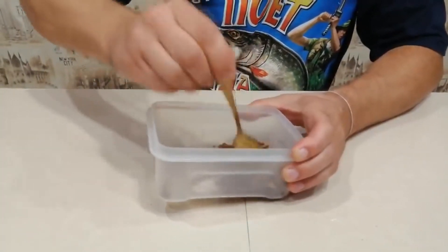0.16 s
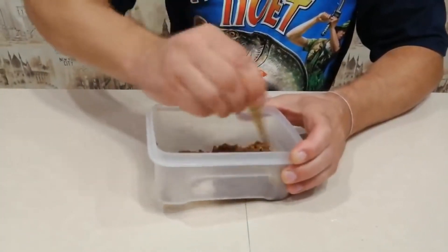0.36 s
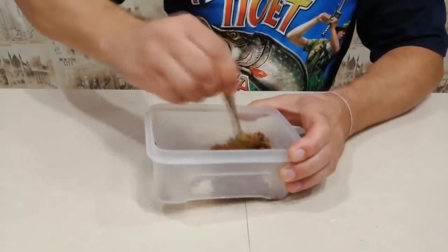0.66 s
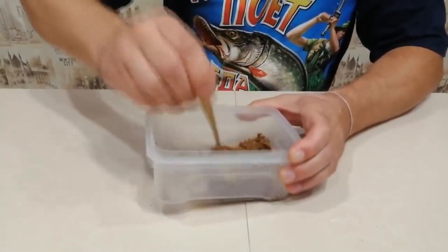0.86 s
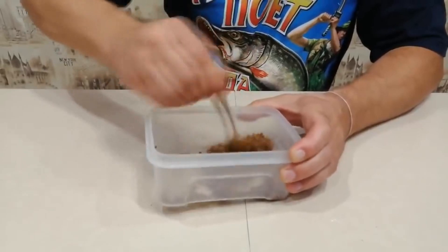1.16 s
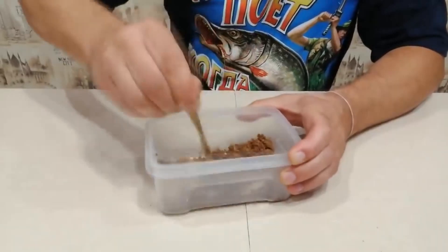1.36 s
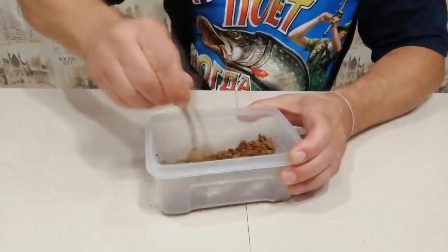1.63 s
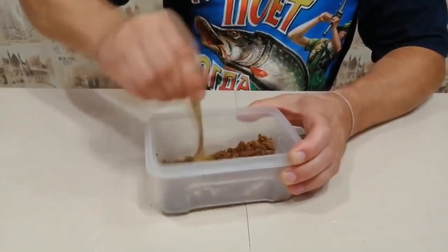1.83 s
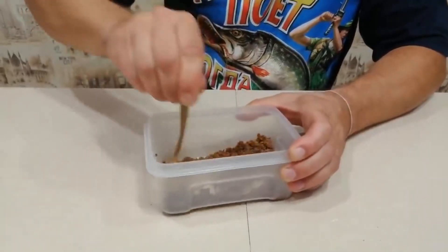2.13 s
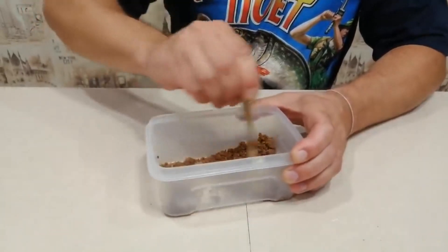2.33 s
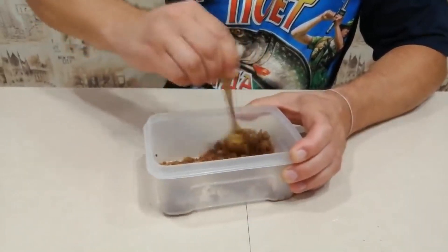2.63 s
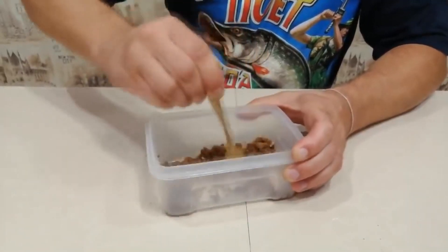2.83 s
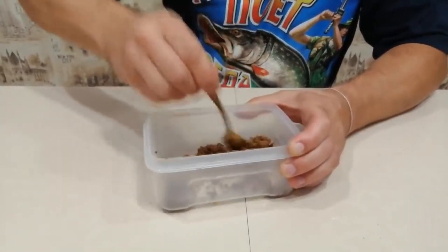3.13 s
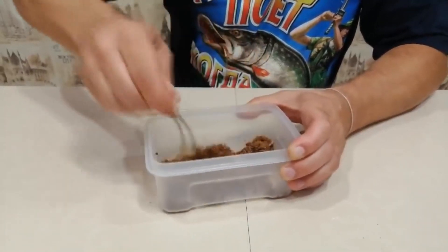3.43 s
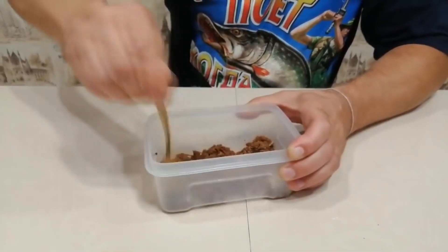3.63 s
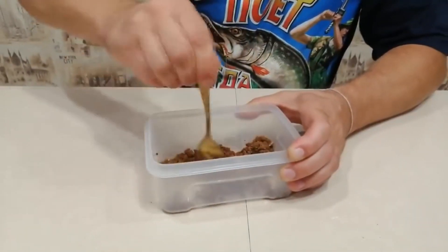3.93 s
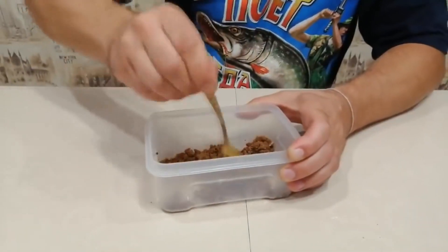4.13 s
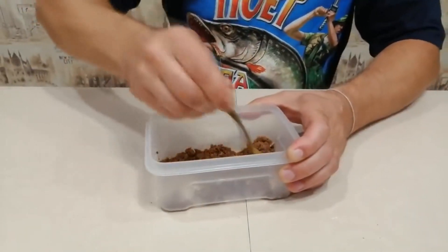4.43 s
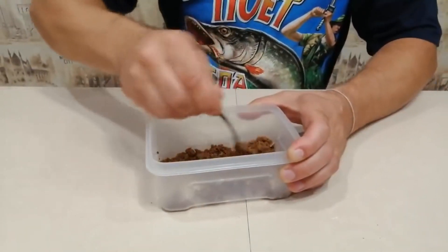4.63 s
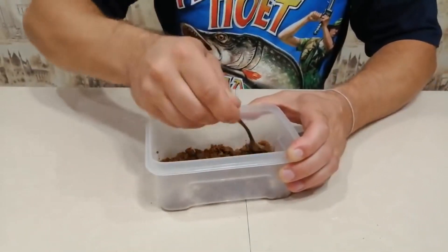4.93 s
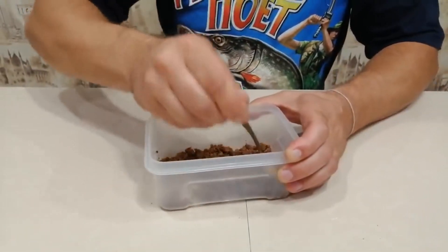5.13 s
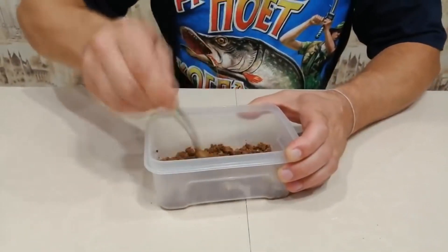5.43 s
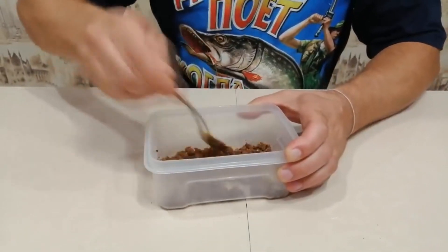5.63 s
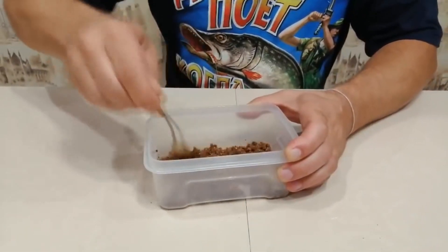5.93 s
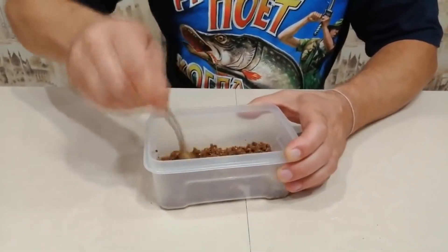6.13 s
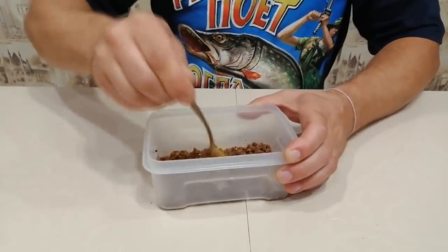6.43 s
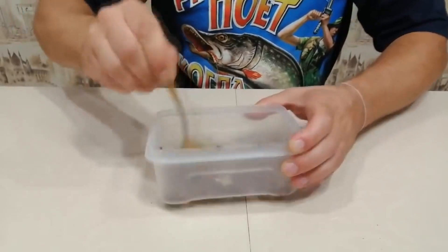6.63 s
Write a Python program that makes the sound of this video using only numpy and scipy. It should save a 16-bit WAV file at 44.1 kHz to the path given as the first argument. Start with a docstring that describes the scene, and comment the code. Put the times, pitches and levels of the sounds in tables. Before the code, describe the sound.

A metal spoon stirs damp crumbs in a plastic box on a table. It knocks unevenly against the floor and walls a few times a second, making short hollow clacks with a slight rattle and a soft thump from the table. Between knocks come faint rubbing on plastic and a gritty crunch and hiss. The stirring continues throughout, heard close up in stereo in a small, quiet room.

```python
"""A metal spoon stirs damp crumbs in a plastic box, on a table in a small room.
Each knock rings the box's floor, walls and corner, chatters on the rim and thumps the table top.
Between knocks the spoon rubs the plastic and crushes crumbs into a gritty crunch and hiss.
Heard close up on a stereo microphone whose two ports each colour the treble their own way;
behind it the room rings on for about a third of a second, over quiet room tone."""
import sys
import numpy as np
from scipy import signal
from scipy.fft import rfft, irfft, next_fast_len
from scipy.io import wavfile

SR = 44100
rng = np.random.default_rng(int(sys.argv[2]) if len(sys.argv) > 2 else 0)


def wav_out(sig):
    """Save sig, one row per channel (or a flat mono array), as 16-bit PCM at SR to the path in sys.argv[1]."""
    wavfile.write(sys.argv[1], SR, np.round(np.clip(np.atleast_2d(sig).T, -1, 1) * 32767).astype(np.int16))


N = 298557


def from_db(db):
    return 10 ** (np.asarray(db) / 20)


def unit_rms(x):
    return x / np.sqrt(np.mean(x ** 2) + 1e-20)


def lowpass(x, hz):
    return signal.sosfilt(signal.butter(2, hz, fs=SR, output="sos"), x)


def at_hz(curve, hz):
    """Read a curve of (Hz, value) rows along a log frequency axis."""
    points_hz, values = np.transpose(curve)
    return np.interp(np.log(np.maximum(hz, 1)), np.log(points_hz), values)


def in_time(rows):
    """Join rows of (seconds, values...) into one curve per column, sample by sample."""
    times, *columns = np.transpose(rows)
    return [np.interp(np.arange(N) / SR, times, column) for column in columns]


def coloured(x, spectrum):
    """Shape x by a dB spectrum and scale it to rms 1."""
    size = next_fast_len(N)
    gain = from_db(at_hz(spectrum, np.fft.rfftfreq(size, 1 / SR)))
    return unit_rms(irfft(rfft(x, size) * gain, size)[..., :N])


def ring(clicks, hz, t60):
    """One mode: each click starts a sine that dies by 60 dB in t60 seconds."""
    decay, step = from_db(-60 / (t60 * SR)), 2 * np.pi * hz / SR
    return signal.lfilter([0, np.sin(step)], [1, -2 * decay * np.cos(step), decay ** 2], clicks + 1e-18)


def strike(modes, levels_db, touches, shares=1, scatter_db=2.5):
    """Touches ring a part's modes, neighbours in opposite directions, in a new mix at every knock."""
    sound = 0
    scatter = scatter_db * rng.standard_normal((len(touches), len(modes)))
    for k, (hz, mode_db, t60) in enumerate(modes):
        clicks = np.zeros((len(levels_db), N))
        for channel, knock_db in zip(clicks, levels_db):
            strength = from_db(knock_db + mode_db + scatter[:, k])
            np.add.at(channel, touches, shares * strength[:, None])
        sound = sound - (-1) ** k * ring(clicks, hz, t60)
    return sound


# The room's diffuse sound at the two ports. Each row: frequency in Hz, left-right likeness from 0 to 1.
PORT_LIKENESS = [(60, 0.69), (180, 1), (550, 0.18), (1650, 0.074), (5000, 0.013)]

def stereo_noise(size, hz):
    """Two white noises, as alike as the ports are at this frequency."""
    mid, side = rng.standard_normal((2, size))
    alike = at_hz(PORT_LIKENESS, hz)
    return np.sqrt((1 + alike) / 2) * mid + np.sqrt((1 - alike) / 2) * side * [[1], [-1]]


# The still room at the microphone. Each row: frequency in Hz, relative spectral level in dB.
ROOM_TONE_SPECTRUM = [(12, -23), (20, -3), (74, -6.5), (130, -5), (337, -3.5), (459, -5.5), (873, -17),
                      (3740, -23.5), (6180, -16), (8650, -25.5), (10800, -29), (14700, -26), (16000, -40)]

def room_tone(level_db=-58):
    """Quiet room tone and microphone hiss, narrower in the bass and wide in the treble."""
    narrow, wide = stereo_noise(N, 100), stereo_noise(N, 5000)
    return from_db(level_db) * coloured(lowpass(narrow - wide, 600) + wide, ROOM_TONE_SPECTRUM)


# How long the small room rings. Each row: frequency in Hz, t60 in seconds.
TAIL_T60 = [(60, 0.27), (200, 0.44), (420, 0.34), (1100, 0.42), (2900, 0.26), (7700, 0.26), (15000, .25)]
# How strongly its tail reaches the microphone. Each row: frequency in Hz, gain in dB.
TAIL_GAIN = [(60, -20), (200, -1.5), (420, 1), (1100, -6.5), (2900, 0), (7700, -4), (15000, -0.5)]
# Standing waves between the walls. Each row: frequency in Hz, gain in dB, t60 in seconds.
STANDING_WAVES = [(205.5, -51, 0.4), (228.1, -50, 0.29), (318.7, -50, 0.18), (421.2, -51.5, 0.25),
                  (541.2, -43.5, 0.13), (614.4, -46.5, 0.18), (670.6, -51, 0.2), (842, -52, 0.16),
                  (999, -50, 0.13), (1072, -63.5, 0.42), (1116, -55, 0.38)]

def room_echoes(source, first_echo_s=0.004):
    """The walls answer with half-octave bands of dying noise and a few standing waves."""
    t = np.arange(SR) / SR
    response = np.zeros((2, SR))
    edges_hz = 45 * 2 ** np.arange(0, 8.6, .5)
    for low, high in zip(edges_hz, edges_hz[1:]):
        hz = np.sqrt(low * high)
        t60 = at_hz(TAIL_T60, hz)
        unit_energy = np.sqrt(6 * np.log(10) / (t60 * SR))
        tail = stereo_noise(SR, hz) * from_db(-60 * t / t60) * unit_energy
        band = signal.butter(2, [low, high], "band", fs=SR, output="sos")
        response += from_db(at_hz(TAIL_GAIN, hz)) * signal.sosfilt(band, tail * (t > first_echo_s))
    build_up = 1 - np.exp(-t / first_echo_s)
    for hz, gain_db, t60 in STANDING_WAVES:
        response += from_db(gain_db - 60 * t / t60) * np.sin(2 * np.pi * hz * t) * build_up
    return signal.fftconvolve(source[None], response, axes=1)[:, :N]


# The table top under the box. Each row: frequency in Hz, relative level in dB, t60 in seconds.
TABLE_MODES = [(78.07, 0, 0.43), (127, -3.5, 0.13)]

def table_rumble():
    """The dragging spoon keeps the table's lowest mode shaking."""
    hz, _, t60 = TABLE_MODES[0]
    return unit_rms(ring(rng.standard_normal(N), hz, t60))


def table_thumps(levels_db, touches):
    """Knocks push on the table; the heavy top takes no sharp edge."""
    return lowpass(strike(TABLE_MODES, [levels_db], touches)[0], 300)


# Short swells of gritty crunch and hiss, many just before a knock.
# Each row: centre in seconds, length in ms, relative crunch and hiss in dB.
GRIT_SWELLS = [(0.03, 28, -63, -49.5), (0.088, 26, -51, -53), (0.606, 15, -45, -48),
               (0.722, 20.0, -63, -50), (0.975, 18, -66, -60.0), (1.24, 12.0, -56, -51),
               (1.31, 22, -53, -46), (1.457, 14.0, -47, -56), (1.672, 16.0, -50, -56),
               (2.15, 34, -63.5, -66.0), (2.466, 17, -58, -47), (2.874, 7.7, -38.0, -50),
               (3.305, 18, -42, -45), (3.333, 18, -41.5, -53), (3.445, 16.0, -38, -55),
               (3.745, 11, -58, -66), (4.658, 11, -39, -43), (4.938, 15, -61.0, -59.0),
               (5.385, 30.0, -55.0, -51), (5.525, 16, -56, -73), (5.765, 14.0, -59, -51),
               (5.83, 23, -57.0, -50), (5.861, 16, -57, -50), (6.025, 22, -53, -50),
               (6.144, 14.0, -61, -62.0), (6.331, 14.0, -54, -57), (6.758, 15, -51, -56)]

def grit_swells():
    """Crunch and hiss gains that briefly swell and fade in a bell curve."""
    t, gains = np.arange(N) / SR, np.zeros((2, N))
    for centre_s, length_ms, *levels_db in GRIT_SWELLS:
        sigma_s = length_ms / 1000 / 4
        bell = np.exp(-.5 * ((t - centre_s) / sigma_s) ** 2)
        gains += from_db(levels_db)[:, None] * bell
    return gains


# The spoon's drag round the box. Each row: time in seconds, then relative levels in dB of
# table rumble, box rub, crumb crunch and crumb hiss.
DRAG_LEVELS = [(0.0, -56, -36, -60, -52), (0.05, -59, -44.5, -50, -44.5), (0.19, -77, -51, -56.5, -55),
               (0.4, -66, -73, -73, -89), (0.45, -65, -46, -51, -49), (0.54, -56, -41, -71, -49),
               (0.6, -47, -59, -46, -48), (0.66, -62, -47, -56.5, -63), (0.79, -65, -51.5, -58, -49),
               (0.92, -71, -57.5, -62, -63), (1.07, -58, -44, -57, -50.5), (1.21, -66, -46, -62, -64),
               (1.32, -70, -41.5, -42, -48), (1.39, -60, -68, -69, -74), (1.53, -68, -39, -44, -49),
               (1.64, -54, -61, -69, -77), (1.77, -60, -56, -47, -40.5), (1.85, -53, -65, -69, -98),
               (1.92, -55, -51, -36, -63), (1.98, -73, -51, -75, -95), (2.2, -55, -57, -69, -62),
               (2.34, -64, -56, -53, -48.5), (2.43, -39, -67, -56, -49), (2.51, -63, -46.5, -60, -52.5),
               (2.68, -51, -62, -55.5, -50), (2.85, -55, -67, -64, -72), (2.92, -49, -41, -43, -68),
               (2.98, -54, -38.5, -50.5, -48), (3.05, -74, -48, -74, -81), (3.11, -53, -76, -67, -79),
               (3.22, -61, -30, -62, -35), (3.26, -64, -33.5, -59, -64), (3.34, -37, -42, -45, -51),
               (3.37, -61, -52.5, -68, -65), (3.41, -66, -67, -68, -63), (3.51, -60, -25, -53, -37.5),
               (3.56, -47, -70, -45.5, -46), (3.67, -46, -55, -87, -95), (3.75, -57, -54, -51, -52),
               (3.86, -51.5, -46.5, -62, -45), (3.92, -65, -95, -83, -77), (4.15, -57, -46, -56, -86),
               (4.2, -44, -47.5, -75, -78), (4.28, -43, -42.5, -69, -75), (4.32, -58, -43, -67, -69),
               (4.41, -45, -56, -62, -85), (4.54, -45, -54.5, -64, -57), (4.64, -46, -55.5, -48, -66),
               (4.73, -52, -49.5, -36.5, -63), (4.81, -62, -71.5, -63, -92), (5.0, -46, -46.5, -61, -48),
               (5.05, -51, -52.5, -51, -48.5), (5.13, -39, -49, -57, -58), (5.19, -53, -28, -55, -50),
               (5.24, -52, -63.5, -93, -83), (5.33, -45, -66, -54, -67), (5.41, -62, -57.5, -73, -60),
               (5.6, -42, -66.5, -67, -112), (5.84, -60, -43.5, -62.5, -42), (5.94, -42, -66, -63, -78),
               (6.0, -34, -40, -53, -49), (6.09, -53, -54, -76, -83), (6.19, -53, -62.5, -60, -63),
               (6.35, -34, -62.5, -84, -69), (6.47, -38, -41.5, -56, -63), (6.62, -70, -57.5, -62.5, -59),
               (6.77, -44, -64.5, -65, -69)]
# Rubbed plastic, crunching and hissing crumbs. Each row: frequency in Hz, relative spectral level in dB.
RUB_SPECTRUM = [(88, -19.5), (150, -4.5), (334, -3), (668, -14), (892, 0.5), (1160, -13.5), (1500, -7),
                (1950, -38.5), (3300, -120)]
CRUNCH_SPECTRUM = [(820, -44.5), (1400, -18), (1590, -3.5), (1970, -2), (2270, 1.5), (3800, -7.5),
                   (4940, -47.5), (8360, -120)]
HISS_SPECTRUM = [(2120, -32), (3600, -14.5), (5430, -1), (5930, 2.5), (6510, 2), (7470, -0.5), (8570, -2),
                 (11100, -13.5), (13000, -13.5), (13900, -25), (14800, -9), (15400, -14.5), (16000, -23.5)]

def spoon_drag(grains_per_s=2500, spread_db=2, gain_db=-5.5):
    """Crumbs crush under the spoon as dense, uneven grains. Returns table rumble and scraping."""
    rumble_gain, rub_gain, crunch_gain, hiss_gain = map(from_db, in_time(DRAG_LEVELS))
    crunch_swell, hiss_swell = from_db(8) * grit_swells()
    sizes = from_db(spread_db * np.minimum(rng.exponential(1, N), 5)) * rng.standard_normal(N)
    grains = sizes * (rng.random(N) < grains_per_s / SR)
    rumble = rumble_gain * table_rumble()
    rub = rub_gain * coloured(grains, RUB_SPECTRUM)
    crunch = (crunch_gain + crunch_swell) * coloured(grains, CRUNCH_SPECTRUM)
    hiss = (hiss_gain + hiss_swell) * coloured(grains, HISS_SPECTRUM)
    return from_db(gain_db) * rumble, from_db(gain_db) * (rub + crunch + hiss)


def chatter(start_s, contact_ms, count=6, fade_db=-2):
    """The spoon bounces in uneven, fading touches. Returns their sample positions and strengths."""
    jitter, sizes = np.transpose(rng.random((len(start_s), count, 2)), (2, 0, 1))
    jitter[:, 0], sizes[:, 0] = 0, 1   # the first touch is on time and the strongest
    delay_s = (np.arange(count) + jitter) / count * contact_ms[:, None] / 1000
    touches = np.minimum(np.round((start_s[:, None] + delay_s) * SR).astype(int), N - 1)
    sizes = sizes * from_db(fade_db * np.arange(count))
    return touches, sizes / np.linalg.norm(sizes, axis=1, keepdims=True)


# Modes of the plastic box and the metal spoon.
# Each row: frequency in Hz, relative level in dB, t60 in seconds.
FLOOR_MODES = [(232.7, -11.5, 0.044), (339, -7.5, 0.079), (416, -6.5, 0.061), (555, -2, 0.021)]
WALL_MODES = [(714, -5, 0.024), (900, -3, 0.024), (1070, -4, 0.021), (1282, -6.5, 0.014)]
CORNER_MODES = [(1570, 1.5, 0.019), (1724, 5, 0.0082)]
RIM_MODES = [(2394, 3, 0.0095), (2670, -4.5, 0.014), (3040, 0, 0.0033)]
SPOON_MODES = [(4080, 2.5, 0.0026), (5270, 1.5, 0.0065), (6560, 8, 0.0026), (8840, -1.5, .003),
               (9930, -8.5, 0.004), (15100, -22.5, .0025)]
# Knocks close to the microphone. Each row: start in seconds, relative levels in dB of table, floor,
# wall, corner, rim and spoon, left over right in dB, contact time in ms.
SPOON_KNOCKS = [(0.0784, -93.0, -63, -42, -36, -50, -46, -4, 2.5),
                (0.0966, -56, -53, -32.5, -41, -44, -37.0, 8, 2.44),
                (0.1108, -66, -59, -33, -26, -58.0, -46, -3, 2.5),
                (0.272, -74, -77, -61.0, -58, -64.0, -51, -1, 3),
                (0.3187, -62, -64, -50.0, -46, -58.0, -56, 1.0, 2.4),
                (0.3685, -69, -59, -30.5, -47, -50.0, -55, 2, 3.3),
                (0.3826, -60, -51, -23, -18.5, -30.0, -25, -3.5, 0.95),
                (0.4338, -56, -28, -22.5, -33, -26, -31.5, -4, 3),
                (0.4858, -36, -20, -16, -24, -25.5, -27, -1, 2.9),
                (0.5995, -60, -45, -32, -46, -37, -32, 1, 4.7),
                (0.696, -47.5, -41, -53, -52.0, -49, -46, 3, 3.1),
                (0.727, -34.5, -33, -54, -61.0, -53, -42, 7, 6.3),
                (0.8074, -52, -49, -38.0, -32, -27, -33.5, 0, 4.7),
                (0.8648, -79, -70, -39, -36, -50, -43.0, -2, 0.94),
                (0.919, -69, -80.0, -57.0, -57.0, -71.0, -51.0, 0.0, 2.2),
                (0.983, -57.0, -42, -37, -41, -62, -46, -1, 3),
                (1.015, -34.5, -27.5, -24.5, -39, -41, -38.5, 4, 2.26),
                (1.062, -65.0, -58.0, -59.0, -61.0, -73.0, -58, 2, 2.0),
                (1.1331, -65, -45, -24.5, -35, -58.0, -49, -4, 2.4),
                (1.2493, -30.5, -22, -54, -28.0, -22, -19, 3, 1.52),
                (1.4673, -51, -22.5, -17, -13, -19, -27.5, 0.5, 1.34),
                (1.6838, -30.5, -22, -20.0, -20, -27.5, -27, -4, 1.58),
                (1.866, -58.0, -37, -27, -38.0, -46.0, -44, 1.0, 1.8),
                (1.8805, -65.0, -36.0, -33, -41.0, -42.0, -47, -2, 3.3),
                (1.8937, -39.5, -11.5, -5.5, -28, -19.5, -21, 0, 3.74),
                (1.9174, -62, -29.5, -21, -53.0, -37, -51, -6, 2.47),
                (2.1338, -54, -42, -35.5, -40, -57.0, -65, -4, 1.2),
                (2.1966, -46, -46, -56, -39, -47, -36.5, -3, 1.36),
                (2.2894, -34.5, -17.5, -9.5, -23.0, -33, -26, -4.5, 1.18),
                (2.3309, -37, -19, -30, -39, -43, -40, -4, 3.5),
                (2.4667, -70, -43, -36, -48.0, -47.0, -33.5, -4, 5.5),
                (2.5581, -57, -62, -62, -56, -61, -35.5, 4, 1.7),
                (2.8581, -59.0, -59, -34.5, -33, -49, -54.0, -9, 1.4),
                (2.8743, -61, -18, -28, -21, -29.0, -20.5, -1, 2.27),
                (2.89, -59.0, -35, -15, -20, -25.5, -29, 4, 2.07),
                (2.8979, -47.5, -16, -13, -44.0, -48.0, -45, 2, 5),
                (2.9744, -70, -27, -26, -65.0, -54.0, -49, -17, 6.4),
                (3.1652, -45, -17, -11.5, -23, -29, -37, -1.5, 4.73),
                (3.2184, -37, -15, -14.5, -23, -22, -26, -5.5, 3.06),
                (3.3123, -69, -30, -24.5, -28, -25.0, -24, -3, 3.1),
                (3.3278, -35, -46, -37.5, -28, -27, -41, 15, 3.3),
                (3.4378, -51, -40.0, -36, -42, -43, -51, 2.0, 2.9),
                (3.4533, -65, -27.5, -37, -22, -22, -23, -3, 0.53),
                (3.4608, -36, -14.5, -12.5, -34, -19.5, -24, 14.5, 3.5),
                (3.6696, -54, -36, -57, -62, -66.0, -67, 1, 4.1),
                (3.7208, -47, -26.5, -17, -34.0, -49, -53, 4.5, 0.91),
                (3.7555, -25, -19, -17.0, -37, -46, -26.5, 9.5, 1.43),
                (3.8823, -62, -65, -34, -42, -32, -33, 1, 3.28),
                (4.1181, -33, -13, -11, -27, -26, -30, 5.5, 2.1),
                (4.3034, -34, -25.5, -15.0, -17.5, -21.5, -23, 5.5, 1.13),
                (4.4489, -57, -34.0, -36, -57, -63, -63, 7, 2.6),
                (4.579, -46.0, -27, -18, -46, -26, -28, 3.5, 3.2),
                (4.659, -60, -39, -43, -34, -28, -28, 3, 1.86),
                (4.6752, -28, -25, -24, -35, -19.5, -15.0, 0.5, 1.78),
                (4.747, -57.0, -35.5, -28, -26, -31, -33, 3.0, 2.2),
                (4.9484, -43, -32.5, -41.0, -58.0, -55, -32.5, 6.5, 1.62),
                (5.0163, -48, -30, -29.5, -49, -46, -35, 3, 4.9),
                (5.1439, -39, -42, -26, -38.0, -42, -43.5, 4, 1.1),
                (5.1508, -31.5, -24.5, -22.5, -57, -67.0, -47, -8, 2.7),
                (5.3019, -35.5, -33, -30.0, -26, -28.5, -34.0, -1, 0.85),
                (5.539, -39, -31, -34, -49.0, -40, -41, 2.5, 3.5),
                (5.772, -36, -28, -32.5, -46, -37, -42, 5.5, 3.1),
                (5.867, -71, -66, -70, -76.0, -66.0, -59.0, -1.0, 7),
                (5.9583, -34.0, -21.5, -17, -27, -31, -31.0, 1.0, 0.86),
                (6.015, -49.0, -52, -36, -52.0, -46.0, -34, -8, 15),
                (6.1562, -34, -31, -27, -60, -56.0, -42, 4, 1.56),
                (6.3398, -30.5, -18, -14, -18.5, -22.5, -32, -3.5, 6.6),
                (6.4328, -56, -47, -52, -33, -36, -47.0, 4.0, 1.83),
                (6.6254, -53, -35.5, -51, -60.0, -65, -62, 1, 4.7),
                (6.654, -54, -38, -54.0, -61.0, -63, -57, 5, 1.6),
                (6.714, -65, -33.5, -53.0, -58.0, -57.0, -57, 11, 2.9),
                (6.7543, -92.0, -43, -43, -37, -43.0, -48.0, -4.0, 3.2),
                (6.7656, -45.0, -32, -20, -7, -18.5, -23.5, -7, 1.3)]

def spoon_knocks():
    """One push rings table and box while rim and spoon chatter on. Returns thumps and clatter."""
    start_s, table_db, *parts_db, pan_db, contact_ms = np.transpose(SPOON_KNOCKS)
    floor_db, wall_db, corner_db, rim_db, spoon_db = (
        [db + pan_db / 2, db - pan_db / 2] for db in parts_db)
    touches, shares = chatter(start_s, contact_ms)
    first_touch = touches[:, :1]
    thumps = table_thumps(table_db, first_touch)
    floor = strike(FLOOR_MODES, floor_db, first_touch)
    wall = strike(WALL_MODES, wall_db, first_touch)
    corner = strike(CORNER_MODES, corner_db, first_touch, shares=0.7)
    box = lowpass(floor + wall + corner, 2500)   # plastic gives under the blow
    rim = strike(RIM_MODES, rim_db, touches, shares)
    spoon = strike(SPOON_MODES, spoon_db, touches, shares)
    return thumps, box + rim + spoon


# The balance drifts between the ports. Each row: time in seconds, left over right in dB for the table,
# then the same for scraping and echoes.
BALANCE_DRIFT = [(0.0, 0.0, 0.5), (0.26, -9, -2.5), (0.34, 1.5, 4), (0.49, -10, 0), (0.85, -8, -2.5),
                 (0.89, -6, -1.5), (1.3, -11.5, -1.5), (1.43, -7, -4.5), (1.71, -10, -2.5), (1.85, -9, -3),
                 (2.11, -5, -4.5), (2.22, -6, -3.5), (2.43, -10, -3.0), (2.83, -10, -2.5), (3.04, -8, -6.5),
                 (3.09, -3, -3.5), (3.36, -8, -2), (3.43, 1, -0.5), (3.54, 3, 1.5), (4.43, 4, 1.5),
                 (4.56, 2.5, 3), (4.64, -9, 1), (4.79, -15, -4), (4.94, -5, -0.5), (5.37, -10, -2.5),
                 (5.73, 5, 3), (5.88, -8.5, -3), (6.45, -9.5, -2), (6.66, -6, -0.5), (6.69, 4, -2),
                 (6.77, -7, 4)]

def scene():
    """The stirring, the table under it and the room around it, in stereo."""
    thumps, clatter = spoon_knocks()
    rumble, scraping = spoon_drag()
    echoes = room_echoes(clatter.mean(axis=0) + scraping)
    table_pan, room_pan = (from_db([db / 2, -db / 2]) for db in in_time(BALANCE_DRIFT))
    return clatter + room_pan * (scraping + echoes) + table_pan * (thumps + rumble) + room_tone()


# The colour of the microphone's two ports. Each row: frequency in Hz, left over right in dB.
PORT_COLOUR = [(60, 1.8), (120, 3.3), (250, 2.3), (1000, 1.4), (2500, 2), (4400, -3), (6500, -10),
               (8700, 14), (12000, -1)]
# A hollow and a slight lift in both ports. Each row: centre in Hz, width in Hz, gain in dB.
MIC_RESPONSE = [(3740, 400, -3), (7920, 360, 0.5)]

def record(dry, left_lead_s=.00007, bass_cut_hz=40, treble_cut_hz=16250):
    """The ports differ in colour and the left hears a little earlier; deep bass and the top are cut."""
    size = next_fast_len(N + 999)
    hz = np.fft.rfftfreq(size, 1 / SR)
    left = from_db(at_hz(PORT_COLOUR, hz) / 2) * np.exp(1j * np.pi * hz * left_lead_s)
    right = 1 / left
    shared_db = sum(db * np.exp(-2 * ((hz - centre) / width) ** 2) for centre, width, db in MIC_RESPONSE)
    ports = irfft(rfft(dry, size) * from_db(shared_db) * [left, right], size)[:, :N]
    ports = signal.sosfilt(signal.butter(2, bass_cut_hz, "high", fs=SR, output="sos"), ports)
    return signal.sosfilt(signal.ellip(12, .5, 95, treble_cut_hz, fs=SR, output="sos"), ports)


dry = scene()
out = record(dry)
wav_out(out)
```